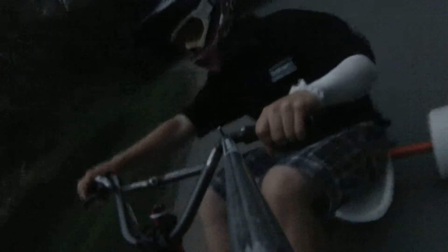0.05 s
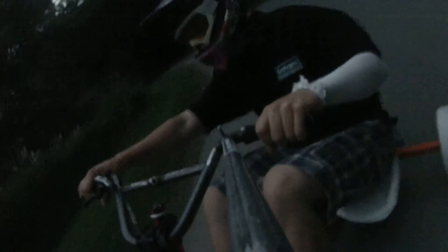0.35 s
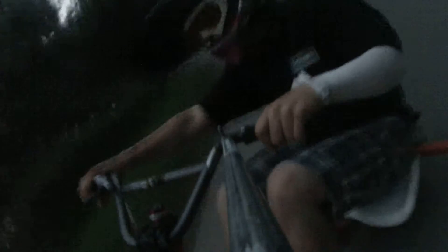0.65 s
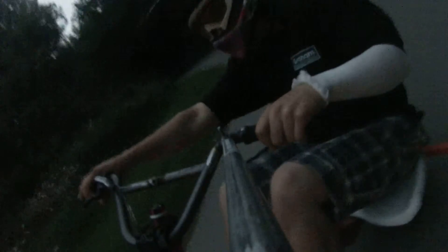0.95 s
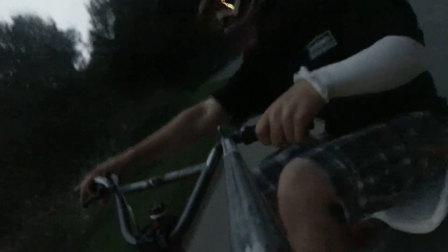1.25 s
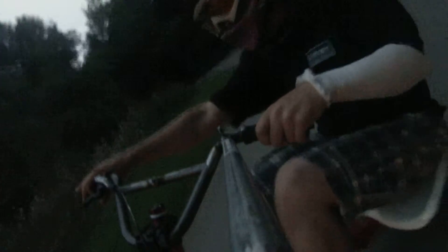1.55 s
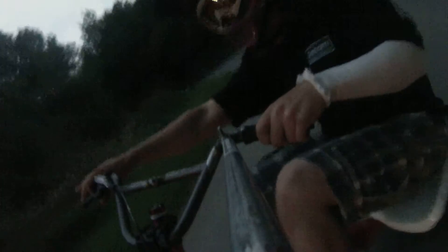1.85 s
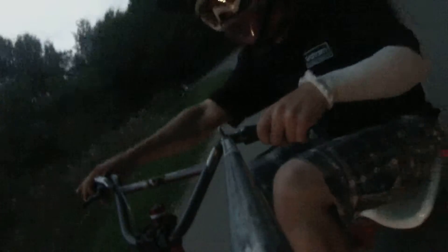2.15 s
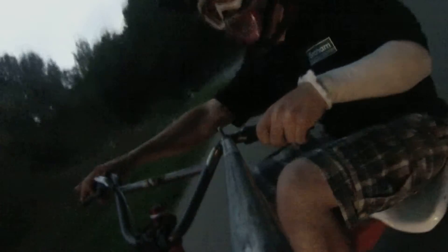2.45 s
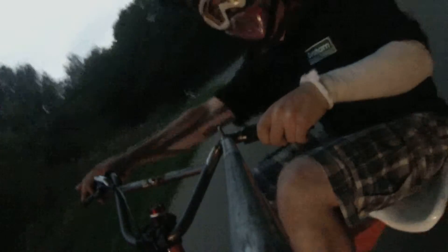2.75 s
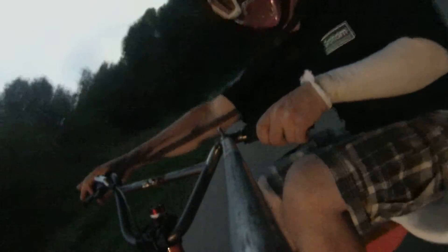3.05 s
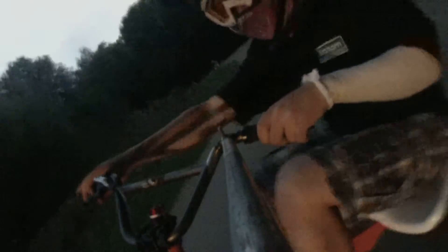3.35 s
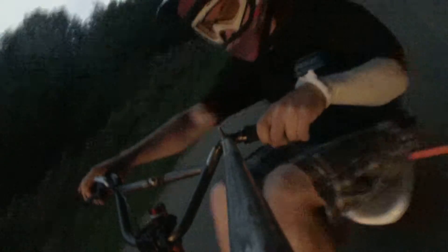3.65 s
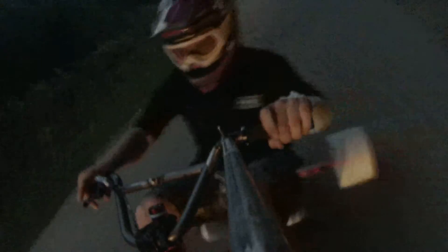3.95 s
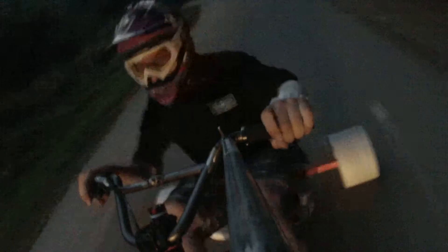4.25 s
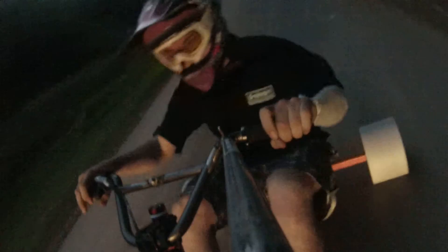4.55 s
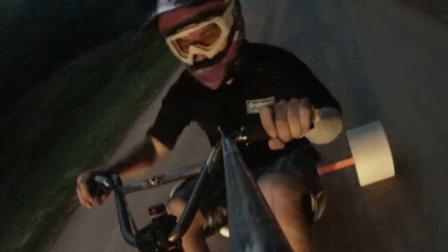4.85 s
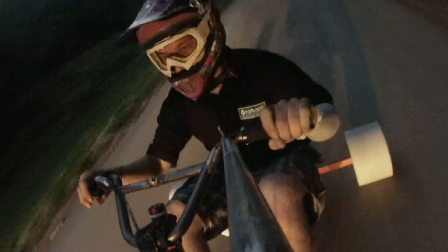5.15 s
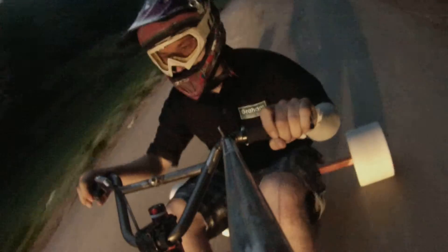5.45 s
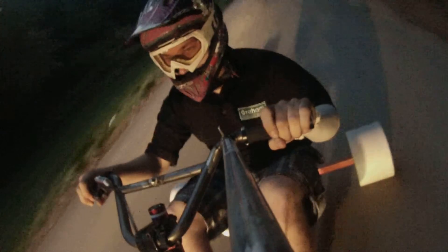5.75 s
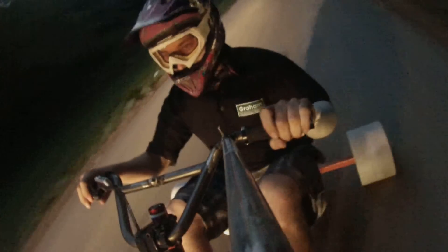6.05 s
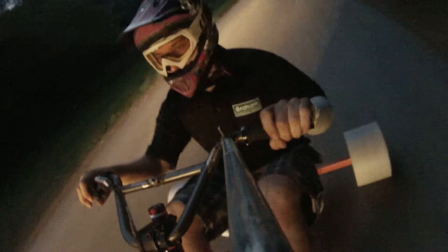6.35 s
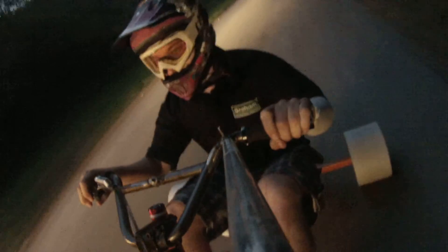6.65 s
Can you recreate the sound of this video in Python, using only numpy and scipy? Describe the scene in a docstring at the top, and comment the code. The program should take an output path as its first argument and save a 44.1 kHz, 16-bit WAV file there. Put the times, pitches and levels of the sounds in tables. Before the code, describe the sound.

A small trike coasts fast along asphalt, heard close from a microphone mounted on its frame. A loud, low, unevenly throbbing boom runs throughout, with wind buffeting and fine grit ticking on the metal. From the start, the hard plastic rear wheels scrape sideways in gritty surges. Sharp, hollow knocks cluster around 0.3 to 0.6 seconds and again near 1.3, and dull thumps mark dips in the road. Stones tick brightly at about 1.5, 2.4 and 3.1 seconds. The noise dips briefly as the wheels skip near 0.6, 2.4, 3.3 and 3.8 seconds, and another rattle of knocks comes around 4. The slide eases from about 3.5 seconds, and by 4.7 the wheels roll straight with a brighter hiss and a hollow, ringing howl. This swells over rough patches between 5 and 6.4 seconds and carries on with the rumble until the end, near 7 seconds.

```python
"""A drift trike coasts fast down asphalt, heard from a microphone on a pole fixed to its frame.
Road bumps keep the frame booming near 100 Hz. The hard plastic rear wheels scrape sideways through a
long slide, knocking over rough spots, then straighten out and roll with a brighter ring.
Stones and grit tick on the frame; wind buffets the microphone."""
import sys
import numpy as np
from scipy import signal
from scipy.fft import rfft, irfft, next_fast_len
from scipy.io import wavfile
from scipy.ndimage import uniform_filter1d

SR = 44100
rng = np.random.default_rng(int(sys.argv[2]) if len(sys.argv) > 2 else 0)


def persist_wave(psi):
    """Save psi, clipped to +-1, as 16-bit WAV."""
    counts = np.round(np.clip(psi, -1, 1) * 32767).astype(np.int16)
    wavfile.write(sys.argv[1], SR, np.atleast_2d(counts).T)


N = 305172


def from_db(db):
    """Decibels to gain."""
    return 10 ** (np.asarray(db) / 20)


def rms_one(x):
    """Scale to unit power."""
    return x / np.sqrt(np.mean(x ** 2) + 1e-20)


def drift(corner_hz):
    """Slow random wander, spread about 1."""
    hop, warmup = 40, 2000
    pole = np.exp(-2 * np.pi * corner_hz * hop / SR)
    noise = rng.standard_normal(N // hop + warmup + 2)
    slow = signal.lfilter([1], [1, -2 * pole, pole * pole], noise)[warmup:]
    return np.interp(np.arange(N) / hop, np.arange(len(slow)), rms_one(slow))


def steady(x, window_s):
    """Hold the running power near 1."""
    size = max(int(window_s * SR), 2)
    power = uniform_filter1d(uniform_filter1d(x * x, size), size)
    return x / np.sqrt(np.abs(power) + 1e-12)


def coloured(x, colour, modes=()):
    """Minimum-phase body filter: broad colour, steep beyond its ends, plus resonances.
    Each colour row: frequency in Hz, gain in dB. Each mode row: centre in Hz, width in Hz, gain in dB."""
    size = 2 * next_fast_len(N // 2 + SR // 10)
    bin_hz = np.arange(size // 2 + 1) * SR / size + 1
    hz, db = np.transpose(colour)
    beyond_oct = np.abs(np.log2(bin_hz / np.clip(bin_hz, hz[0], hz[-1])))
    colour_db = np.interp(np.log(bin_hz), np.log(hz), db) - 30 * np.minimum(beyond_oct, 2)
    power = from_db(colour_db) ** 2
    for centre_hz, width_hz, mode_db in modes:
        power += from_db(mode_db) ** 2 / (1 + 2 * ((bin_hz - centre_hz) / width_hz) ** 2) ** 2
    cepstrum = irfft(np.log(power) / 2)
    cepstrum[1:size // 2] *= 2
    cepstrum[size // 2 + 1:] = 0
    return irfft(rfft(x, size) * np.exp(rfft(cepstrum)))[:N]


def narrow_ring(hz, width_hz):
    """A lightly damped mode kept ringing by random contacts; unit power."""
    phase = 2 * np.pi * np.cumsum(hz * np.ones(N)) / SR
    return rms_one(drift(width_hz) * np.cos(phase) + drift(width_hz) * np.sin(phase))


def ticks(force, decay_s):
    """One decaying noise burst per impulse."""
    envelope = signal.lfilter([1], [1, -np.exp(-1 / (decay_s * SR))], force + 1e-18)
    return envelope * rng.standard_normal(N)


def asphalt(per_s, spread_db, judder_db, judder_hz):
    """Stone tips hit the wheel at random, in clumps as the hard wheel hops."""
    sizes = from_db(spread_db * np.minimum(rng.exponential(1, N), 5)) * rng.choice([-1, 1], N)
    hits = sizes * (rng.random(N) < per_s / SR)
    return steady(hits * from_db(judder_db * drift(judder_hz)), 0.088)


def frame_boom(drive_db, slip, mode_hz=101.77, sag_hz=6.5, throb_hz=7.1, lag_s=0.038):
    """The frame's bending mode throbs unevenly, about seven beats a second, and sits lower in a slide."""
    pole = np.exp(-1 / (lag_s * SR))
    late_db = signal.lfilter([1 - pole], [1, -pole], drive_db)  # the heavy frame answers late
    throb_rate_hz = throb_hz * (1 + 0.301 * drift(4.05))
    throb = (1 + np.sin(2 * np.pi * np.cumsum(throb_rate_hz) / SR)) / 2
    depth = np.clip(0.55 * (1 + 0.5 * drift(4.5)), 0, 0.9)
    ring = steady(narrow_ring(mode_hz - sag_hz * slip, width_hz=6.28), 0.05)
    return from_db(late_db - 9.5) * (1 - depth * throb ** 2) * ring


def frame_shake(drive_db, gain_db=-28):
    """Bumps drum on the seat and the higher frame modes."""
    # Frame response. Each row: frequency in Hz, relative level in dB.
    colour = [(90, -13.5), (125, -2), (160, -7.5), (200, -10.5), (280, -12.5), (310, -23.5), (390, -31),
              (520, -32), (740, -28.5), (820, -56)]
    # Higher frame modes. Each row: centre in Hz, width in Hz, relative level in dB.
    modes = [(244.8, 13.1, 0), (523, 38, -26.5), (624.3, 5.9, -24)]
    bumps = asphalt(per_s=1500, spread_db=1.5, judder_db=4, judder_hz=30)
    return from_db(gain_db + drive_db) * steady(coloured(bumps, colour, modes), 0.34)


def axle_judder(drive_db, slip, gain_db=-34):
    """Wheels hopping sideways add a dull flutter."""
    colour = [(120, 0), (155, 3), (220, -9), (340, -18.5), (460, -19.5), (600, -33.5)]
    hops = asphalt(per_s=1200, spread_db=0.5, judder_db=4.5, judder_hz=30)
    return slip * from_db(gain_db + drive_db) * steady(coloured(hops, colour), 0.15)


def tube_ring(drive_db, waver_db=3.5):
    """Thin rings of the steel tubes come and go with the shaking."""
    # Tube modes. Each row: centre in Hz, width in Hz, base level in dB.
    modes = [(613, 4.7, -53.5), (1213, 22, -53), (1837, 22, -54), (2150, 25, -55.5), (4503, 45, -56.5)]
    return sum(from_db(db + drive_db + waver_db * drift(19)) * narrow_ring(hz, width_hz)
               for hz, width_hz, db in modes)


def sliding_wheels(drive_db, slip, scrape_db=-35.5, spray_db=-73, grab_db=2.04):
    """Hard plastic dragged sideways grabs and lets go in gritty surges; hard grabs spray fine dust."""
    # Scrape spectrum. Each row: frequency in Hz, relative level in dB.
    colour = [(600, -44), (850, -14.5), (1050, -15), (1500, -13.5), (2400, -25), (2750, -22.5), (3450, -32),
              (3900, -26), (4250, -34), (6100, -31.5), (6700, -35), (7200, -46), (9000, -47),
              (13000, -54.5)]
    # Sliding wheel modes. Each row: centre in Hz, width in Hz, relative level in dB.
    modes = [(1210, 120, -8), (1730, 110, -8), (1855, 60, -6), (2125, 50, 0), (2265, 150, 1),
             (3680, 120, -25), (4560, 120, -18), (5050, 400, -22), (5820, 130, -23), (8000, 200, -29),
             (9970, 120, -36), (11950, 150, -42), (13500, 400, -45)]
    dust_colour = [(4500, -8.5), (6500, -11), (7300, -16.5), (10000, -1.5), (12500, -27)]
    surge_db = drive_db + grab_db * drift(10.8)
    grit = asphalt(per_s=3200, spread_db=3.2, judder_db=2.6, judder_hz=80)
    scrape = from_db(scrape_db + surge_db) * steady(coloured(grit, colour, modes), 0.09)
    dust = asphalt(per_s=2300, spread_db=2.5, judder_db=14.5, judder_hz=25)
    spray = from_db(spray_db + 2.2 * surge_db) * rms_one(coloured(dust, dust_colour, [(7900, 210, 0)]))
    return slip ** 1.49 * (scrape + spray)


def wind(drive_db, gain_db=-27.5, gust_db=2.5):
    """Lumpy turbulence on the microphone housing, stronger as the pole shakes."""
    # Turbulence spectrum. Each row: frequency in Hz, relative level in dB.
    colour = [(12, -11.5), (20, -8), (33, -5.5), (55, -0.5), (75, 5), (110, -17.5)]
    gusts = from_db(gain_db + drive_db - gust_db * drift(10))
    return gusts * steady(coloured(rng.standard_normal(N), colour), 0.059)


def loose_grit(per_s=20, gain_db=-49):
    """Small grains tick against the frame at random."""
    colour = [(1500, -6.5), (3000, 11), (6000, -2), (13500, -12.5)]
    strikes = rng.random(N) < per_s / SR
    sizes = from_db(gain_db + 5.4 * np.minimum(rng.exponential(1, N), 2.5))
    return coloured(ticks(strikes * sizes, decay_s=0.0015), colour)


def road_roughness_db(edge_s=0.014):
    """Extra drive builds through each rough patch and ends abruptly."""
    # Rough patches. Each row: start in seconds, length in seconds, roughness in dB.
    patches = [(0.297, 0.18, 6), (0.917, 0.32, 4.5), (1.803, 0.29, 4), (2.21, 0.16, 3.5), (2.5, .24, 4.7),
               (2.89, .415, 5.5), (3.874, 0.17, 5), (4.67, .27, 3.5), (4.975, 0.17, 7), (5.35, 0.074, 5.5),
               (5.579, 0.3, 5), (5.985, 0.39, 5.5), (6.87, .1, 4)]
    t, db = np.arange(N) / SR, np.zeros(N)
    for start_s, length_s, rough_db in patches:
        progress = (t - start_s) / length_s
        db += rough_db * np.clip(progress, 0, 1) ** 0.34 * (progress < 1)
    return uniform_filter1d(db, int(edge_s * SR))


def stones():
    """Each stone flicked against the frame gives a dry, bright tick."""
    # Stone strikes. Each row: time in seconds, strength in dB.
    strikes = [(.314, -35.5), (0.627, -46), (1.468, -26), (2.373, -29.5), (3.144, -26.5), (3.424, -39),
               (4.062, -49), (4.123, -43), (4.305, -38)]
    colour = [(800, -23), (3000, 6), (6000, 6), (13500, -21)]
    force = np.zeros(N)
    for time_s, db in strikes:
        force[int(time_s * SR)] = from_db(db)
    return coloured(ticks(force, decay_s=0.0024), colour)


def knocks(crack_db=-1, hollow_db=-5, rattle_db=5):
    """A rough spot sets off a rattle of contacts; square hits also sound the wheel drum's hollow note."""
    # Rough spots. Each row: peak time in seconds, strength in dB, half length in seconds,
    # hollowness in dB.
    spots = [(0.33, -29.5, 0.012, -1), (0.457, -19, 0.0078, 2), (0.537, -23.5, 0.0055, -4),
             (0.596, -22.5, 0.0037, 6), (0.603, -26, 0.0051, 5.5), (1.208, -31.5, 0.0087, 4.5),
             (1.283, -17.5, 0.0046, 5.5), (1.385, -33, 0.0039, 1.5), (1.796, -34, 0.0053, 4),
             (2.235, -33.5, 0.0072, -19), (2.719, -32, 0.018, 2.5), (3.454, -23, 0.0043, -4),
             (3.734, -29, 0.012, 3.5), (3.927, -30.5, 0.028, 2.5), (3.965, -21, 0.0061, 2),
             (3.982, -15, 0.0036, -12), (4.025, -27, 0.01, 4)]
    # Crack spectrum. Each row: frequency in Hz, relative level in dB.
    crack_colour = [(700, -13.5), (1500, -21), (2400, -9), (2900, -16.5), (5300, -17), (7000, -36),
                    (13000, -50)]
    # Crack and drum modes. Each row: centre in Hz, width in Hz, relative level in dB.
    crack_modes = [(1785, 64, 4.5), (2178, 190, 8)]
    drum_modes = [(970, 290, -23.5), (1205, 130, 16)]
    force, hollow_force, t = np.zeros(N), np.zeros(N), np.arange(N) / SR
    for peak_s, db, half_s, hollowness_db in spots:
        near = slice(int((peak_s - 0.06) * SR), int((peak_s + 0.06) * SR))
        offset_s = t[near] - peak_s
        tau_s = half_s * np.where(offset_s < 0, 0.45, 0.59)  # rise, fall
        swell = from_db(db) / np.cosh(np.clip(offset_s / tau_s, -20, 20))
        force[near] += swell
        hollow_force[near] += swell * from_db(hollowness_db)
    rattle = steady(from_db(rattle_db * drift(380)), 0.0034)
    crack = steady(coloured(rng.standard_normal(N), crack_colour, crack_modes), 0.002)
    hollow = steady(coloured(rng.standard_normal(N), [(800, -22), (1400, -18)], drum_modes), 0.002)
    return rattle * (from_db(crack_db) * force * crack + from_db(hollow_db) * hollow_force * hollow)


def jolts(gain_db=5):
    """Each dip in the road gives the whole frame one dull thump."""
    # Road dips. Each row: time in seconds, relative peak in dB.
    dips = [(0.612, -11), (1.088, -13), (1.284, -12.5), (2.366, -12.5), (3.149, -15), (3.166, -11),
            (3.288, -12.5), (3.728, -16.5), (3.969, -8.5), (4.126, -13), (5.405, -13)]
    # Thump spectrum. Each row: frequency in Hz, relative level in dB.
    colour = [(30, -18.5), (80, 8), (130, -1.5), (300, -27), (900, -35), (1500, -44)]
    force = np.zeros(N)
    for time_s, db in dips:
        force[int(time_s * SR)] = from_db(db)
    unit_thump = coloured(signal.unit_impulse(N), colour)
    return from_db(gain_db) * coloured(force, colour) / np.abs(unit_thump).max()


def wheel_lift_db(edge_s=0.014):
    """Drive lost as the wheels skip and go light; it returns as the weight settles."""
    # Wheel skips. Each row: start in seconds, drop in dB, settling time in seconds.
    skips = [(0.637, 8.5, 0.15), (1.63, 1.5, 0.2), (2.384, 9.5, 0.15), (3.314, 7, 0.12),
             (3.755, 9.5, 0.082), (4.14, 3.5, 0.18), (5.9, 1, .1), (6.76, 0.5, .12)]
    t, db = np.arange(N) / SR, np.zeros(N)
    for start_s, drop_db, settle_s in skips:
        db += drop_db * (t > start_s) * np.clip(1 - ((t - start_s) / settle_s) ** 2, 0, 1)
    return uniform_filter1d(db, int(edge_s * SR))


def rolling_wheels(drive_db, slip, hiss_db=-32.5, howl_db=-43.5, waver_db=0.5):
    """Running straight, the hollow drums ring brightly; pressed hard, their lowest note howls."""
    # Rolling spectrum. Each row: frequency in Hz, relative level in dB.
    colour = [(600, -19.5), (850, -24.5), (1050, -16), (2000, -22.5), (2600, -25.5), (2900, -21.5),
              (3450, -30.5), (4700, -25), (5000, -17.5), (6150, -20.5), (6500, -36.5), (7200, -41),
              (13000, -61)]
    # Rolling wheel modes. Each row: centre in Hz, width in Hz, relative level in dB.
    modes = [(1210, 70, -4), (1330, 180, -10), (1735, 70, -11), (1850, 60, -14), (2140, 80, -12),
             (2395, 110, -3), (3640, 60, -21), (4060, 80, -22), (4320, 50, -16), (4580, 85, -2),
             (5295, 80, -8), (5445, 55, -8), (5620, 110, -11), (5845, 55, -8), (6690, 70, -26),
             (8000, 280, -26), (9650, 500, -27), (10900, 300, -38), (11950, 150, -33), (12300, 110, -40),
             (13500, 300, -38)]
    surge_db = drive_db + waver_db * drift(9.8)
    grit = asphalt(per_s=9000, spread_db=2.5, judder_db=1, judder_hz=34.7)
    hiss = from_db(hiss_db + surge_db) * steady(coloured(grit, colour, modes), 0.19)
    howl = from_db(howl_db + 1.9 * surge_db) * steady(narrow_ring(hz=1208, width_hz=30), 0.06)
    return (1 - slip) ** 2.38 * (hiss + howl)  # slip chokes the ring


def scene():
    """Road and slip drive frame, wheels and wind; all sum with the impacts at one microphone."""
    # Sideways run of the wheels. Each row: time in seconds, slip from 0 to 1.
    slip_curve = [(0, 0.79), (0.9, 0.83), (1.8, 0.89), (2.6, .98), (3.25, 1), (3.55, 0.68), (4.27, 0.57),
                  (4.36, 0.39), (4.55, .38), (4.72, 0.18), (6.92, 0.08)]
    slip = np.interp(np.arange(N) / SR, *np.transpose(slip_curve))
    rough_db, lift_db = road_roughness_db(), wheel_lift_db()
    boom = frame_boom(-0.5 * slip - 0.3 * rough_db - lift_db, slip)  # ducks in loud, rough stretches
    shaking_db = 0.97 * rough_db - 0.98 * lift_db
    shake = frame_shake(shaking_db) + axle_judder(shaking_db, slip)
    frame = boom + shake + jolts() + tube_ring(shaking_db - 3 * slip)
    sliding = sliding_wheels(0.9 * rough_db - 0.99 * lift_db, slip)
    rolling = rolling_wheels(1.31 * rough_db - 0.94 * lift_db, slip)
    hits = knocks() + stones() + loose_grit()
    air = wind(rough_db - 0.97 * lift_db + 3.5 * slip)
    return (frame + sliding + rolling + hits + air)[None]


def record(dry, ceiling=0.95, fade_s=0.006, stopband_hz=16000):
    """Soft-limit the peaks, fade the ends, cut the top."""
    rounded = dry / (1 + (dry / ceiling) ** 8) ** (1 / 8)
    faded = rounded * signal.windows.tukey(N, 2 * fade_s * SR / N)
    return signal.sosfilt(signal.cheby2(12, 70, stopband_hz, fs=SR, output="sos"), faded)


dry = scene()
out = record(dry)
persist_wave(out)
```